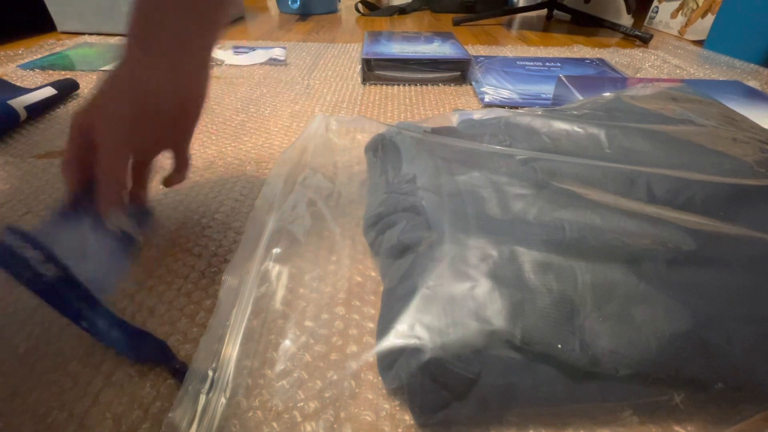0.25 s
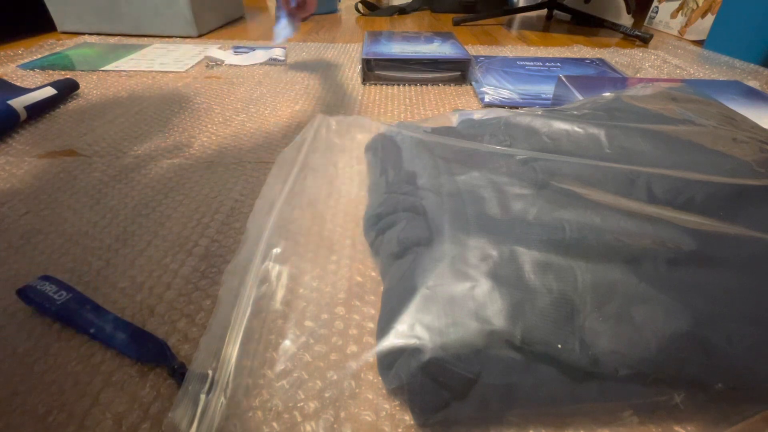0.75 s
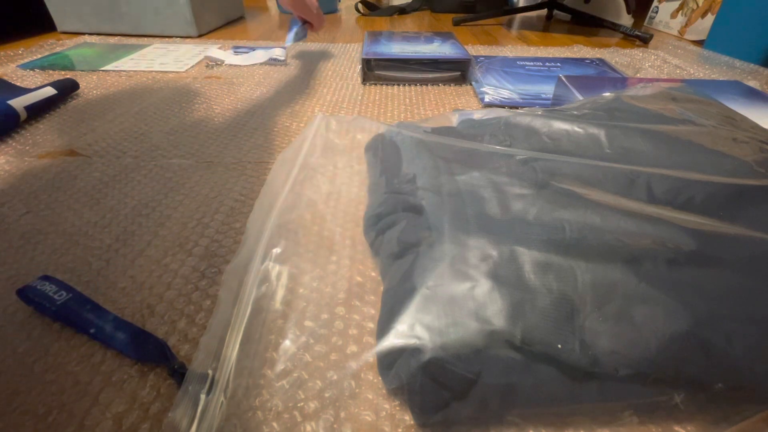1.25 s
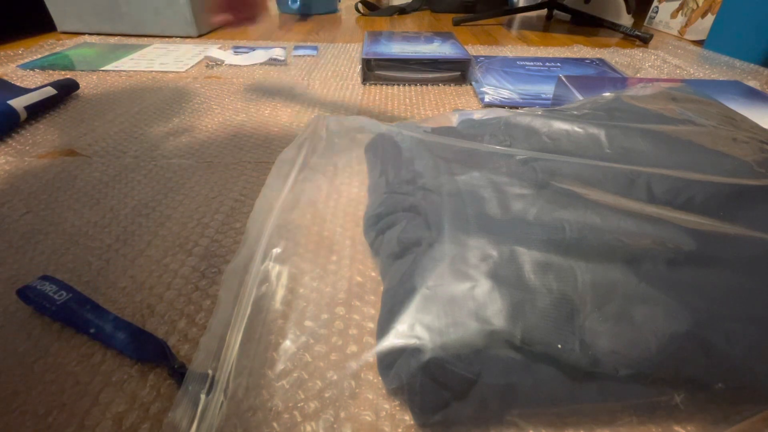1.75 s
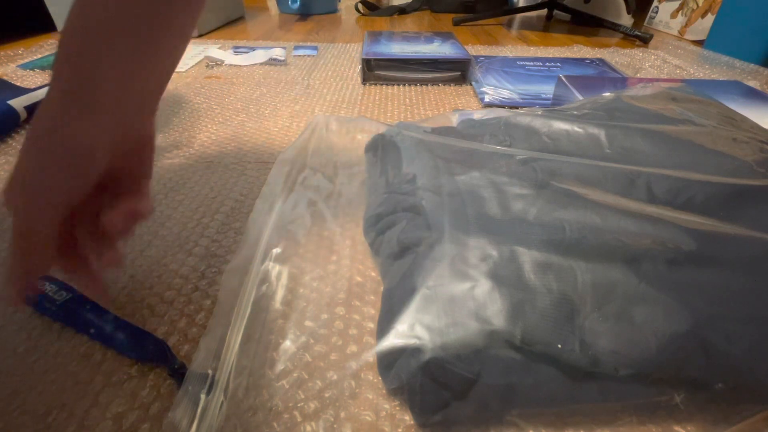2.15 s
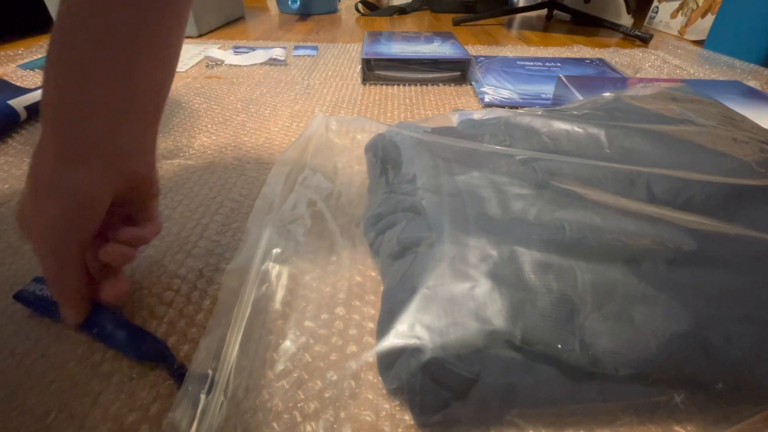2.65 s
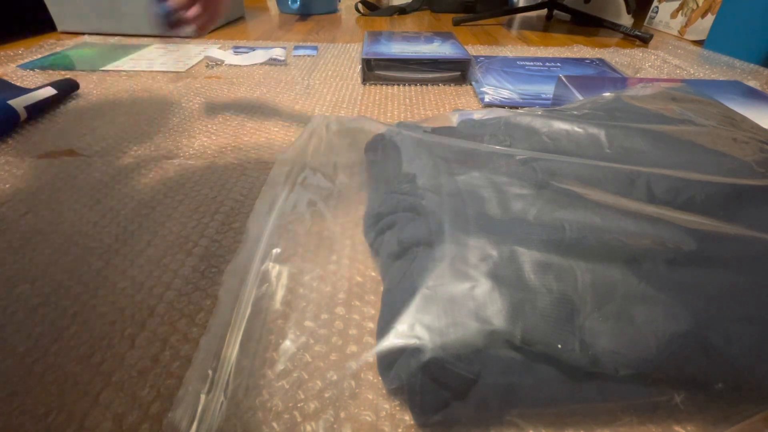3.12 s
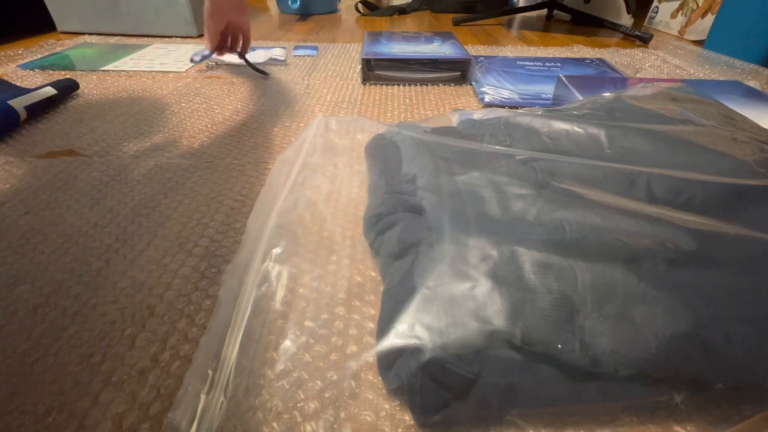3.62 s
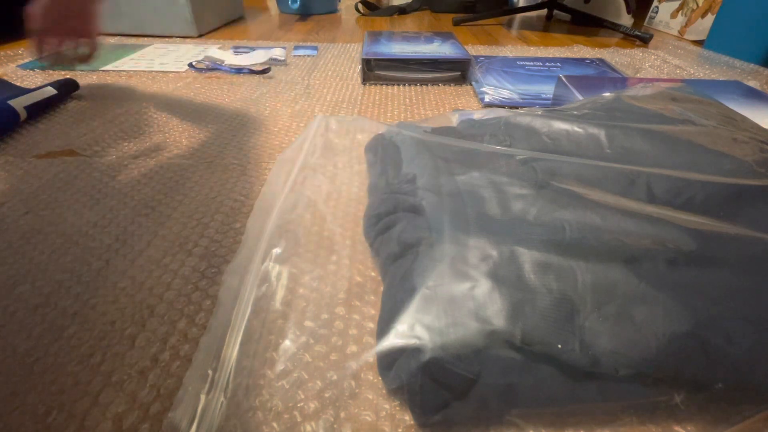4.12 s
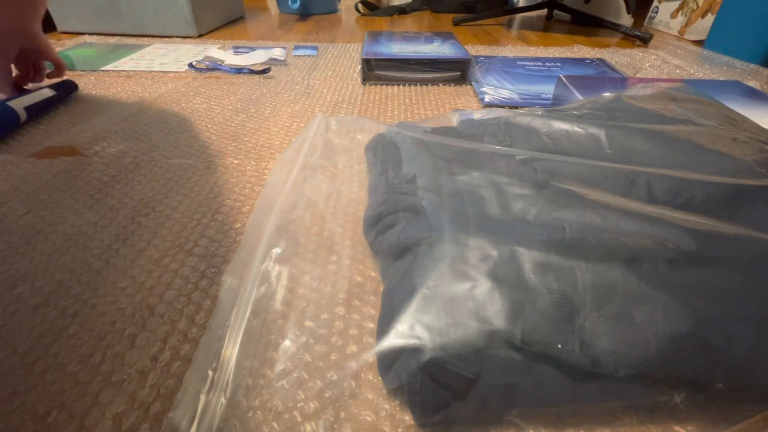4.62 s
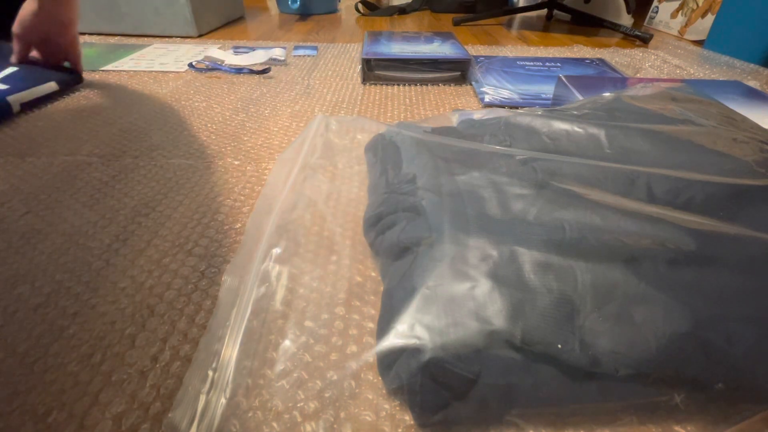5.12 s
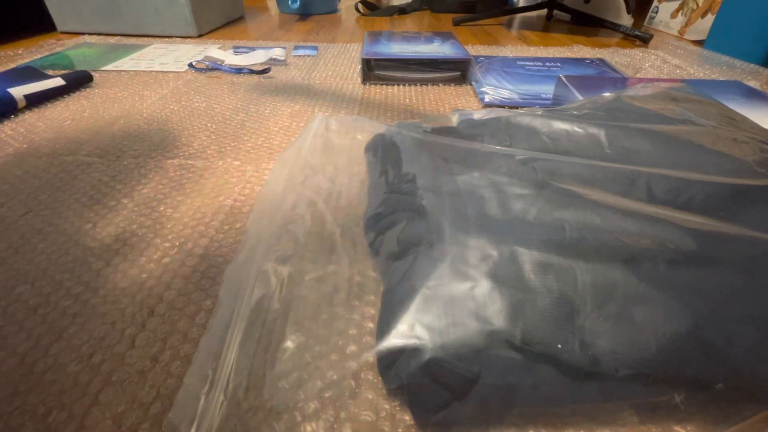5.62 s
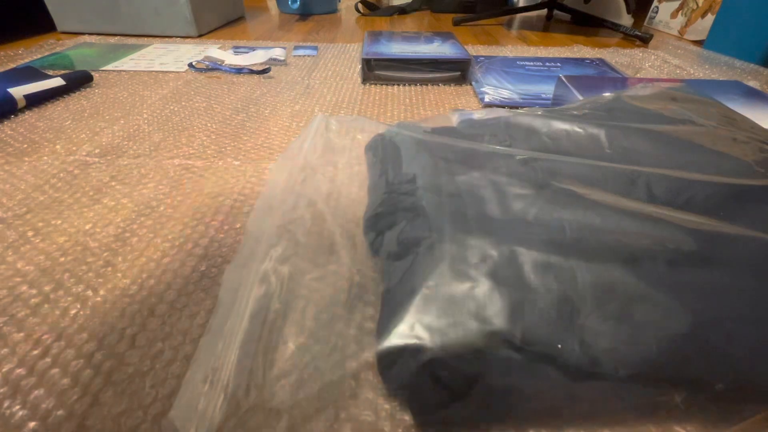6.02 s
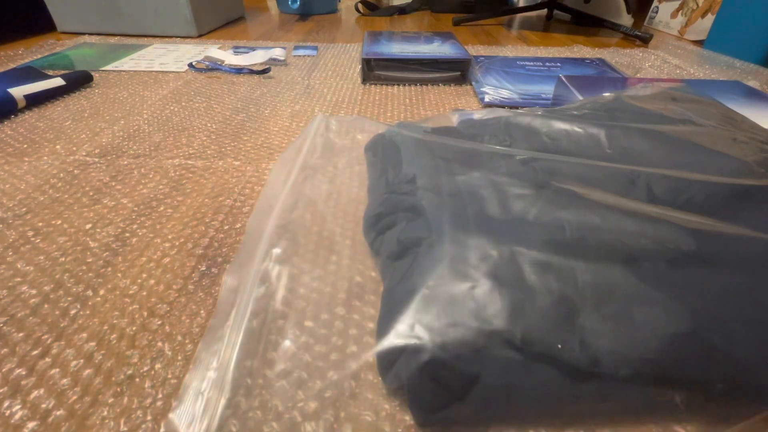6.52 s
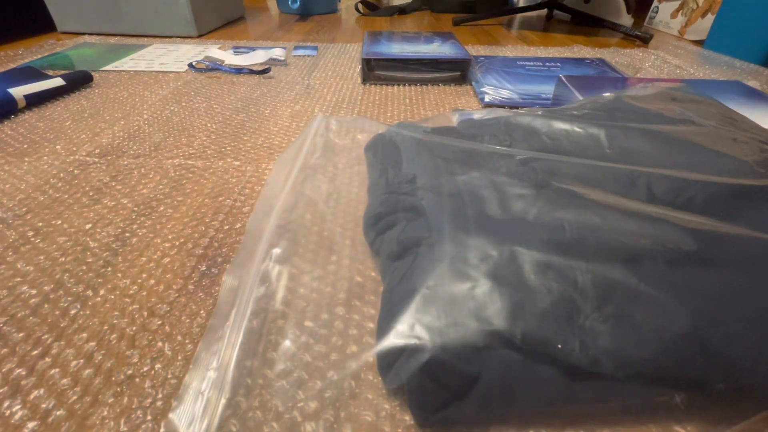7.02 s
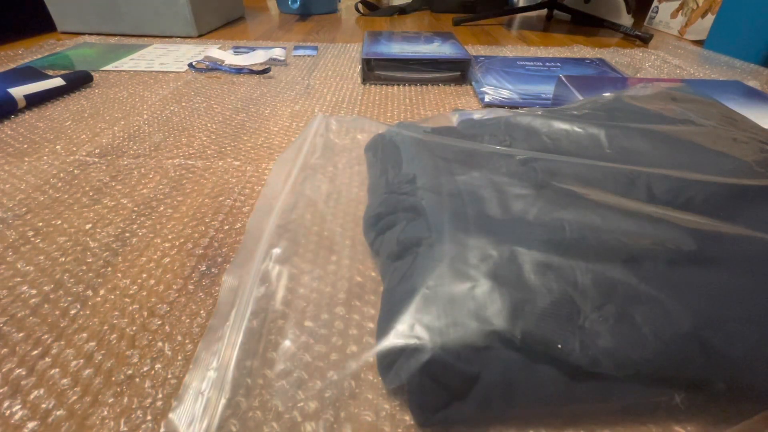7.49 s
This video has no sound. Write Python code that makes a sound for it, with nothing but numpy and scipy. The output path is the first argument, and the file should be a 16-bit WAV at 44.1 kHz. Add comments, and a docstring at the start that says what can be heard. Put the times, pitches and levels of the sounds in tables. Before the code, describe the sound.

Thin plastic crinkles and snaps to the left as small things are picked up, then cloth rustles, joints crack and a low floor thud follows.

```python
"""Things picked off a mat

A hand picks a card, a strap and a packet off a woven mat to the left of a two-port microphone and lays
them out: filtered noise and random clicks make the slide and crinkle of plastic, short bursts the snaps.
Then the person shifts on the wooden floor: soft noise is the cloth, impulses are the cracking joints, and
pushes set wood ringing for knees and hard knocks. The small room echoes and hums faintly below."""
import sys
import numpy as np
from scipy import signal
from scipy.fft import rfft, irfft
from scipy.io import wavfile
from scipy.ndimage import uniform_filter1d

SR = 44100
rng = np.random.default_rng(int(sys.argv[2]) if len(sys.argv) > 2 else 0)


def generate_wav(signal):
    """Clip the signal to [-1, 1] and save it as 16-bit WAV at the path in sys.argv[1]."""
    frames = np.transpose(np.atleast_2d(signal))
    scaled = np.clip(frames, -1, 1) * 32767
    pcm = np.round(scaled).astype(np.int16)
    wavfile.write(sys.argv[1], SR, pcm)


N = 341775
HZ = np.maximum(np.fft.rfftfreq(N, 1 / SR), 1)   # every frequency in the spectrum of the whole sound

# The colour of thin plastic. Each row: frequency in Hz, relative strength in dB.
PLASTIC = [(250, -17), (400, -15), (700, -19), (1040, -6), (1650, -8.5), (2600, -5.5), (3000, 4),
           (3400, 5.5), (3800, 3), (4300, -0.5), (4700, -2.5), (5200, 2), (5500, -6.5), (5900, 5),
           (6500, 3), (7100, 2), (7600, 1), (8000, 5), (9000, -1), (13000, -1.5), (16000, -13.5)]
# How each thing sounds, by name: sizzle above 10.2 kHz, rub under 2.3 kHz and body at 2.3-3.95 kHz, all in
# dB against the main band, then crackle share of the power (0-1, below 0 counts as 0) and flutter in dB.
THINGS = {"card": (-0.5, -11.5, -6, 0.3, 1.64), "laid": (-4, -4.5, -5.5, -0.45, 1.2),
          "strap": (-4.5, -16, -8, 0.5, 1.5), "coiled": (4, -18, -13, 0.4, 2),
          "packet": (-4.5, -3.5, -3.1, 0.33, 0.4)}
# Strokes of the hand. Each row: start in seconds, level in dB, seconds to swell by 20 dB, seconds held,
# seconds to fade by 20 dB, thing handled. Swells and fades below 0.003 s count as 0.003 s.
STROKES = [(0.0, -58.5, .02, 0.024, 0.064, "card"), (0.095, -67, 2.5, 0.025, 0.14, "card"),
           (0.086, -59.5, 0.2, 0.023, 0.0751, "card"), (0.174, -50.5, 0.14, 0.045, 0.0641, "card"),
           (0.22, -57, 0.1, 0.031, 0.02, "card"), (0.267, -79, .03, 0.027, -0.3, "card"),
           (0.34, -79, -1, 0.0034, 0.75, "card"), (0.447, -85, -0.3, 0.015, 1.5, "card"),
           (1.366, -65, 0.01, 0.0076, 0.1347, "laid"), (1.448, -57, 0.0733, 0.019, 0.07, "laid"),
           (1.487, -67.5, 0.05, 0.0083, 0.12, "laid"), (2.199, -62, 0, 0.004, 0.04, "strap"),
           (2.27, -68.5, 0.11, 0.06, 0.32, "strap"), (2.41, -62, 0.04, 0.015, 0.03, "strap"),
           (2.346, -55.5, 0.0159, 0.045, -0.01, "strap"), (2.463, -59.5, 0.0148, 0.059, -0.01, "strap"),
           (2.541, -56, 0.012, 0.058, -0.02, "strap"), (2.657, -57.5, 0.04, 0.03, 0.0168, "strap"),
           (2.7, -60.5, 0.03, 0.014, 0.03, "strap"), (2.79, -63.5, 0.09, 0.036, 0.08, "strap"),
           (2.612, -55.5, 0.12, 0.024, 0.0723, "strap"), (2.757, -60.5, 0, 0.0033, -0.0847, "strap"),
           (2.844, -57, 0.1546, 0.021, 0.01, "strap"), (2.883, -57.5, 0, 0.0087, 0.0169, "strap"),
           (2.902, -70, 0, 0.011, 0.06, "strap"), (3.4, -71.5, 0, 0.004, 0.07, "coiled"),
           (3.533, -76, 0.5, 0.028, -0.17, "coiled"), (3.69, -73.5, 0.14, 0.031, 0.11, "coiled"),
           (4.358, -76.5, 0.18, 0.0043, -6, "packet"), (4.434, -65, 0.0648, 0.068, -0.24, "packet"),
           (4.538, -66.5, 0.0949, 0.038, -0.55, "packet"), (4.594, -73, 0.16, 0.041, 1.7, "packet"),
           (4.706, -68, 0.03, 0.012, 0.2, "packet"), (4.805, -65, 0.0148, 0.097, -2.3, "packet"),
           (5.004, -61, .5, 0.18, 0.18, "packet"), (5.236, -63, 0, 0.026, 0.12, "packet")]


def hand():
    """Sliding friction hiss and clumped crackle of creases, in the colour of thin plastic."""
    clumps = grains(1400 * amp(2.5 * drift(150)), spread_db=5.0)
    both = colour(np.array([rng.standard_normal(N), clumps]), PLASTIC)
    sizzle, rub = cut(both, 10200, "high"), cut(both, 2300, "low")
    body, main = cut(both, [2300, 3950], "band"), cut(both, [4550, 10200], "band")
    bands = [sizzle, rub, body, main]
    flickers = [1.4 * drift(25) for band in bands]   # each band flickers by itself
    out, flutter = 0, drift(23)
    for thing, (*levels_db, crackle, flutter_db) in THINGS.items():
        share = np.sqrt(np.clip([1 - crackle, crackle], 0, 1))
        mix = 0
        for db, band, own in zip([*levels_db, 0], bands, flickers):
            mix = mix + amp(db + flutter_db * own) * rms_one(share @ band)
        # where strokes overlap, the louder one counts
        strokes = np.max([stroke(*row[:5]) for row in STROKES if row[5] == thing], axis=0)
        out = out + amp(flutter_db * flutter) * mix * strokes
    return from_the_left(out)


def stroke(s, db, swell_s, hold_s, fade_s):
    """Gain of one stroke: swell, hold, fade."""
    t = np.arange(N) / SR - s
    swell_db = -20 * np.maximum(-t / max(swell_s, .003), 0)
    fade_db = -20 * np.maximum((t - hold_s) / max(fade_s, .003), 0)
    return amp(db + swell_db + fade_db)


# Short bright snaps of creases and of cloth. Each row: start in seconds, peak at 5.9-8.5 kHz in dB before
# it is placed to the left, brightness in dB (raises the top band and lowers the body).
SNAPS = [(0.0435, -43, 6), (0.074, -38.5, -11), (0.0825, -50, 3), (0.102, -44, -2), (0.1086, -41, -10),
         (0.1225, -50, 13), (0.158, -45, 16), (0.176, -30, 3), (0.194, -47, -10), (0.2123, -37.5, 12),
         (0.2325, -53, 6), (0.259, -44, 5), (0.364, -55, 16.5), (0.375, -42, -10), (0.435, -60, 17),
         (0.4757, -53, 2), (0.565, -62, -24), (1.104, -52, 2.5), (1.4387, -46, 6), (1.732, -61, -19.5),
         (1.835, -62.5, 1.5), (2.189, -63, 11), (2.204, -51, 0), (2.2063, -33, 0.5), (2.223, -51, 17),
         (2.2344, -64.5, 2), (2.268, -52, -16), (2.336, -48, 5), (2.3445, -52, -4), (2.3505, -48, -3),
         (2.362, -49, -3.5), (2.409, -43, -4), (2.4195, -39.5, 5), (2.457, -49, 12), (2.4624, -46, 8),
         (2.4683, -39.5, 6.5), (2.48, -46, 7), (2.4962, -34.5, 2), (2.5506, -34, 1), (2.5632, -39, 6),
         (2.593, -38, 2), (2.599, -39, -3), (2.6066, -34, 4), (2.632, -56, 2), (2.647, -47, 9),
         (2.661, -42, 4), (2.703, -54, 11), (2.735, -54, 10), (2.758, -43, 5), (2.784, -57, 10),
         (2.808, -52.5, 1), (2.833, -40, 7), (2.836, -39, 2), (2.838, -49, 0), (2.858, -37.5, 8),
         (2.86, -42, 2), (2.847, -41, -3), (2.872, -44, 3), (2.883, -51, 0), (2.8855, -34.5, -12.5),
         (2.8918, -41, 13), (3.208, -60, 0), (3.382, -84, -10), (3.4685, -70, 10), (3.508, -52.5, 17.5),
         (3.6456, -72.5, 22), (3.6905, -57.5, 0.5), (3.7321, -49, -9), (3.856, -75, 8.5), (3.985, -66, 20),
         (4.213, -75, 15), (4.301, -57, 6), (4.54, -47, -21), (4.664, -69, -4), (4.6776, -67, 2),
         (5.304, -43, -10), (5.325, -54, 12.5), (5.699, -44.5, -1), (5.6703, -44.5, 7), (5.738, -50, -17),
         (5.7994, -57, -2), (6.4032, -52.5, 1), (6.4453, -66, -18), (6.4926, -48, 0), (6.5252, -44.5, -3),
         (7.416, -66, 7)]
# Milliseconds to die by 60 dB: the main band, the top band, the body.
SNAP_MS = [6.5, 2.5, 6.5]
SNAP_TOP_DB, SNAP_BODY_DB = -4.5, -15   # top band and body against the main peak
SNAP_BODY_FOLLOWS = 0.61   # dB of body lost per dB of brightness


def snaps():
    """Each snap dies in a few milliseconds: a tick and grit in three bands."""
    out = np.zeros(N + 800)
    edges_hz = [(5900, 8530), (10970, 14500), (1950, 4100)]
    for (s, db, bright_db), noise in zip(SNAPS, rng.standard_normal((len(SNAPS), 600))):
        i = round(s * SR)
        sharp = noise + 6.2 * signal.unit_impulse(600)   # a leading tick, then grit
        top_db = db + SNAP_TOP_DB + bright_db
        body_db = db + SNAP_BODY_DB - SNAP_BODY_FOLLOWS * bright_db
        out[i:i + 600] += in_bands(sharp, SNAP_MS, edges_hz, [db, top_db, body_db])
    return from_the_left(out[:N])


def in_bands(x, rings_ms, edges_hz, levels_db):
    """Bands of a burst, each dying at its own rate and set to its own peak."""
    out = 0
    for ms, edge, db in zip(rings_ms, edges_hz, levels_db):
        band = cut(burst(x, max(ms, 1) / 1000), edge, "band", order=2)
        out = out + amp(db) * band / np.max(np.abs(band))
    return out


# Level difference for a source on the left. Each row: frequency in Hz, left over right in dB.
SHADOW = [(60, 9), (150, -1.5), (380, 3), (950, 7.5), (2380, 7.5), (5980, 14), (15000, -8.5)]
LEFT_LAG_MS = -0.431   # negative: the left port hears it first


def from_the_left(x):
    """Sound from the left: earlier at the left port, its level there depending on pitch."""
    return place(x, LEFT_LAG_MS, at_hz(SHADOW, HZ))


FAR_PORT_ECHO_DB, FAR_PORT_ECHO_MS = -1.5, 1.5   # the reflection; its delay wanders around this


def far_port(x):
    """The shaded right port also hears the hand by way of the mat, along a path that wanders slowly."""
    delay = FAR_PORT_ECHO_MS * SR / 1000 * np.clip(1 + .4 * drift(1.5), .1, 3)   # in samples
    late = np.interp(np.arange(N) - delay, np.arange(N), x[1])
    late = cut(late, [1500, 9800], "band", order=2)
    return x + amp(FAR_PORT_ECHO_DB) * late * [[0], [1]]


# Hard little cracks of card edge and joints. Each row: start in seconds, relative level in dB, slope in dB
# per octave, ring in Hz, ring in dB, second ring in Hz, its dB, left over right in dB, rattle in ms to die
# by 60 dB (at least 2).
CRACKS = [(0.108, -61.5, 2, 2710, 14, 1840, 17, 2.5, 11), (0.134, -53, -2.7, 2110, 23, 6640, 17, 7.5, 15),
          (0.1355, -57.5, 3.5, 990, 22, 5000, 10, 1, 21),
          (0.1362, -49.5, -0.5, 2760, 19, 5100, 3, 5.5, 12.4), (0.349, -68, 6, 3530, 2, 6900, -0.5, 7, 34),
          (1.368, -69, 3.5, 1020, 20, 6960, 2, 0, 20), (5.243, -53, 1.1, 1500, 14, 3000, -4, 5.5, 4.9),
          (5.249, -60.5, -3, 3000, 8, 1100, 8, 8.5, 11), (5.608, -63, -2, 1650, 19, 2540, 14, 5.5, 5.9),
          (5.6103, -64.5, 1.5, 5170, 6, 7000, 5, 12, 7.1), (6.0723, -66, -2, 8200, 19, 6200, 3, 12, 18),
          (6.0746, -45.5, -2, 8500, 13.5, 2200, 15, 8, 3),
          (6.0764, -51.5, -4.5, 1370, 10, 4350, -1, -2, 27),
          (6.7736, -51.5, -2.5, 8560, 16.5, 5100, 6, 7, 8.7),
          (6.7744, -55, -4, 1020, 17.5, 2460, 12, 6.5, 8.5), (7.27, -44, -4.5, 5270, 11, 3330, 8.5, 6, 21),
          (7.2712, -54.5, -4.5, 920, 7, 2140, 20, 3, 15), (7.65, -67, -13.5, 690, 3.5, 1200, -9, -1, 28)]
# Colour shared by all cracks. Each row: frequency in Hz, strength in dB.
CRACK_COLOUR = [(150, -1.1), (4300, -1.5), (5000, 0.5), (5600, -2), (6800, -0.5), (8200, -0.1),
                (9500, -5.5), (16000, -4.5)]
CRACK_LAG_MS, RING_OCTAVES, CRACK_TOP_DB = -0.27, 0.23, -5.5   # left first; ring width; above 10 kHz
CRACK_ECHO_DB, ECHO_RING_SHARE = 3.5, 0.47   # impulse sent to the room; share of the rings' dB in it


def cracks():
    """One sharp impulse and a brief rattle, sloped and with two rings; the impulse also excites the room."""
    out = np.zeros((2, 2, N + 3000))   # heard directly or sent to the room, then left or right
    hz = np.geomspace(150, 16000, 120)
    noises = rng.standard_normal((len(CRACKS), 3, 1500))
    for (s, db, slope_db, *rings, pan, rattle_ms), noise in zip(CRACKS, noises):
        impulse = signal.unit_impulse(1500)
        # the rattle is partly its own at each port
        left, right = [burst(0.4 * noise[0] + 0.29 * own, max(rattle_ms, 2) / 1000) for own in noise[1:]]
        parts = [0.28 * impulse + left, 0.68 * impulse + right, amp(CRACK_ECHO_DB) * impulse]
        shape_db = db + slope_db * np.log2(hz / 2000) + at_hz(CRACK_COLOUR, hz)
        shape_db = shape_db - 9.5 * np.log2(np.maximum(800 / hz, 1))   # little bass
        shape_db = shape_db + CRACK_TOP_DB * (hz > 10000)
        rings_db = 0
        for ring_hz, ring_db in np.reshape(rings, (2, 2)):
            rings_db = rings_db + ring_db * np.exp(-(np.log2(hz / ring_hz) / RING_OCTAVES) ** 2)
        shares = [1, 1, ECHO_RING_SHARE]
        x = [colour(part, np.c_[hz, shape_db + share * rings_db]) for part, share in zip(parts, shares)]
        x = amp(25.5) * np.array(x)
        for side, sign in enumerate((1, -1)):
            i = round((s + sign * CRACK_LAG_MS / 2000) * SR)   # half the lag at each port
            out[:, side, i:i + 1500] += amp(sign * pan / 2) * x[[side, -1]]
    return out[..., :N]


# The cloth's colour. Each row: frequency in Hz, relative strength in dB.
CLOTH = [(90, -29.5), (150, -4), (300, -2.5), (700, -5.5), (1200, -7.5), (1800, -12.5), (2300, -17),
         (4000, -12), (8000, -7), (13000, -22), (16000, -28.5)]
# Cloth as the person shifts, before the trims below. Each row: time in seconds, swish under 2.15 kHz in dB,
# hiss at 2.1-10.2 kHz in dB, sizzle above 9.2 kHz in dB.
SHIFT = [(5.4, -79, -96, -86), (5.455, -83, -80, -86), (5.47, -76, -74, -79), (5.52, -73.5, -68.5, -76),
         (5.56, -67.5, -68.5, -66), (5.6, -65.5, -68, -60), (5.65, -62.5, -62, -67), (5.71, -68, -66, -69),
         (5.745, -72, -68, -74), (5.78, -77, -69.5, -78), (5.85, -65, -74.5, -76), (5.9, -75, -80, -80),
         (5.93, -84, -72.5, -75), (6.04, -81, -82.5, -75), (6.09, -68, -57, -75.5), (6.14, -69.5, -61, -84),
         (6.22, -68.5, -71, -77), (6.33, -75, -68.5, -73), (6.44, -81.5, -79, -89),
         (6.51, -73.5, -65, -66.5), (6.6, -69.5, -68, -81.5), (6.73, -66.5, -71, -77),
         (6.84, -65, -65, -71.5), (7.03, -62, -61.5, -67.5), (7.17, -71, -66.5, -76), (7.27, -71, -76, -79),
         (7.44, -82, -82.5, -83.5), (7.63, -63.5, -70.5, -79), (7.75, -62.5, -68.5, -88)]
# The sleeve as the arm reaches. Each row: time in seconds, swish in dB, hiss in dB.
REACH = [(0.3, -82.5, -107), (0.55, -83, -88), (1.02, -77.5, -85.5), (1.33, -82, -81), (1.6, -85, -93),
         (1.84, -83, -86.5), (2.1, -84, -100), (2.55, -83.5, -94), (2.93, -86.5, -93), (4.4, -85.5, -98.5),
         (5.4, -125, -91)]


def cloth():
    """Broad soft swish from all round, in patches, with a slight crumple."""
    on, swish_db, hiss_db, sizzle_db = in_time(SHIFT)
    crumple = place(colour(grains(600, spread_db=1.0), CLOTH), lag_ms=-0.29, pan_db=27.3)
    x = rms_one(diffuse(CLOTH)) + .5 * rms_one(crumple)
    swish = rms_one(cut(x, 2150, "low"))
    hiss = rms_one(cut(x, [2100, 10200], "band"))
    sizzle = rms_one(cut(x, 9200, "high"))
    shift = amp(swish_db + 2.0 + 2.44 * drift(16.5)) * swish
    shift = shift + amp(hiss_db - 1.0 + 1.04 * drift(7.3)) * hiss
    shift = shift + amp(sizzle_db + 4.5 * drift(20)) * sizzle
    reaching, reach_db, brush_db = in_time(REACH)
    sleeve = reaching * (amp(reach_db) * swish + amp(brush_db) * (hiss + amp(-2.0) * sizzle))
    soft_on = uniform_filter1d(on * 1., size=2000)   # no click where the shifting starts
    return (soft_on * shift + sleeve) * amp([[1.2], [-1.2]])   # slightly louder on the left


# A short squeak in the rustle. Each row: time in seconds, pitch in Hz, level in dB.
SQUEAK = [(5.615, 1950, -85), (5.625, 1950, -67), (5.635, 1750, -69), (5.648, 1600, -85)]


def squeak():
    """A brief, slightly rough tone sliding down."""
    on, hz, db = in_time(SQUEAK)
    return on * amp(db + 3.6 * drift(150)) * np.sin(2 * np.pi * np.cumsum(hz) / SR)


# Where thuds and knocks come from, by name: lag of the left port in ms, left over right in dB.
PLACES = {"left": (-0.4, 3.5), "behind": (0.47, -0.7)}
# Weight landing on the boards. Each row: start in seconds, relative strength in dB, contact in ms, place.
THUDS = [(1.448, -51, 0.13, "left"), (2.2, -52, 0.29, "left"), (2.848, -53.5, 0.093, "left"),
         (5.073, -44.5, 0.59, "left"), (5.304, -44, 0.9, "left"), (5.598, -38, 2.4, "left"),
         (6.08, -41, 0.7, "left"), (6.225, -11.5, 1.5, "behind"), (6.487, -51, 0.17, "behind"),
         (7.495, -31, 0.17, "behind"), (7.548, -40, 0.38, "behind")]
# Tones of the floor boards. Each row: frequency in Hz, relative level in dB, longest time in seconds to
# die by 60 dB.
BOARDS = [(36.8, -14, 0.54), (61.3, -3, 0.17), (105.3, 0, 0.22), (139.7, -2.5, 0.15), (185.5, -4.5, 0.155),
          (243.8, 0.5, 0.19), (320, 1.5, 0.017)]


def thuds():
    """Soft pushes ring the floor boards."""
    rings = amp(-10.5) * struck(pushes(THUDS), BOARDS)
    return sum(place(x, *where) for x, where in zip(rings, PLACES.values()))


# Things knocking on wood. Each row: start in seconds, relative strength in dB, contact in ms, place.
KNOCKS = [(0.109, -47, 0.13, "left"), (0.697, -64, 0.052, "left"), (1.369, -41, 0.32, "left"),
          (1.382, -43, 0.31, "left"), (1.391, -40.5, 0.51, "left"), (4.134, -48, 0.81, "left"),
          (4.165, -45, 1.2, "left"), (4.302, -47.5, 0.65, "left"), (5.075, -54.5, 0.024, "left"),
          (5.303, -41.5, 0.055, "left"), (5.306, -45, 0.62, "left"), (5.32, -39.5, 0.41, "left"),
          (5.839, -57, 0.037, "left"), (6.661, -21, 0.077, "behind"), (7.274, -39.5, 0.21, "left"),
          (7.496, -46, 0.51, "behind"), (7.506, -46, 0.29, "behind"), (7.524, -31.5, 1.1, "behind"),
          (7.548, -40, 0.98, "behind"), (7.629, -43.5, 0.14, "behind"), (7.652, -44, 0.3, "behind")]
# Tones of the knocked wood. Each row: frequency in Hz, relative level in dB, longest time in seconds to
# die by 60 dB.
KNOCKED = [(104.3, -18.5, 0.16), (170, -5.5, 0.04), (252, -4.5, 0.13), (335.6, -2.5, 0.064),
           (421, 0.5, 0.024), (621, -3, 0.022), (742, 3, 0.016), (843, 1, 0.021), (1020, -5, 0.012),
           (1333, 4, 0.011), (1500, -0.5, 0.0041), (2098, -7, .01), (2700, -9.5, 0.0094),
           (3350, -38, 0.0076)]
# Hard blows from behind. Each row: frequency in Hz, left over right in dB, radians by which left leads.
BEHIND_PORTS = [(100, -2, -1.2), (250, -1.5, 0.2), (448, 3.5, -0.9), (750, 8.5, -1), (1300, -3, -2),
                (3000, 4.5, -2.5)]


def knock():
    """Harder blows into short wooden modes."""
    left, behind = amp(-4.5) * struck(pushes(KNOCKS), KNOCKED)
    hz, pan_db, lead = np.transpose(BEHIND_PORTS)
    lag_ms = -1000 * at_hz(np.c_[hz, lead], HZ) / (2 * np.pi * HZ)
    return place(left, *PLACES["left"]) + place(behind, lag_ms, at_hz(np.c_[hz, pan_db], HZ))


def pushes(events):
    """Smooth contact forces of unit area, scaled by strength, one track for each place: longer is duller."""
    out, ms = np.zeros((len(PLACES), N + 2000)), np.arange(2000) * 1000 / SR
    for s, db, contact_ms, where in events:
        i = round(s * SR)
        force = ms * np.exp(-ms / max(contact_ms, .02))
        out[list(PLACES).index(where), i:i + 2000] += amp(db) * force / force.sum()
    return out[:, :N]


MOST_CYCLES = 28   # wood damps any mode within this many cycles


def struck(force, modes):
    """Modes of alternating sign, as radiated from a flexing board."""
    out = 0
    for k, (hz, db, t60) in enumerate(modes):
        out = out + (-1) ** k * amp(db) * ring(force, hz, min(t60, MOST_CYCLES / hz))
    return out


# Alikeness of the two sides in the echo tail. Each row: frequency in Hz, likeness (1 is the same).
ECHO_LIKENESS = [(60, 0.95), (250, 0.86), (500, 0.29), (1000, 0.058), (8000, 0.041)]
# How long the room echoes. Each row: frequency in Hz, seconds to die by 60 dB.
ROOM_T60 = [(100, 0.29), (1000, 0.19), (8000, 0.24)]


def room(x):
    """Echo tail: octave bands of noise dying at their own rate, alike on both sides in the bass."""
    t, tail = np.arange(SR // 2) / SR, 0
    for hz in 60 * 2. ** np.arange(8):
        octave = [hz / np.sqrt(2), hz * np.sqrt(2)]
        mid, side = cut(rng.standard_normal((2, len(t))), octave, "band", order=2)
        noise = two_sides(mid, side, at_hz(ECHO_LIKENESS, hz))
        tail = tail + noise * amp(-60 * t / at_hz(ROOM_T60, hz)) * np.clip(t / 0.00048, 0, 1)
    tail = tail / np.sqrt(np.sum(tail ** 2) / 2)
    return signal.fftconvolve(x, tail, axes=-1)[:, :N]


# Low room modes in which the house rumbles. Each row: frequency in Hz, width in Hz, relative level in dB.
HUM = [(34.6, 20, -9), (54.5, 3.4, -14.5), (71, 17, 4.5), (119.6, 8, -9), (160, 5.7, -17.5)]
# Loudness of the rumble. Each row: time in seconds, level in dB, around which it wanders.
RUMBLE = [(0.0, -71), (0.24, -63.5), (0.41, -82), (0.48, -68.5), (1.8, -72), (1.96, -62.5), (2.14, -74.5),
          (3.1, -69.5), (3.3, -72.5), (4.3, -74), (5.12, -68), (5.45, -72.5), (6.1, -63.5), (6.21, -61),
          (6.28, -50), (6.45, -60), (6.72, -59), (6.84, -64.5), (7.06, -60), (7.26, -69.5), (7.54, -61),
          (7.75, -59)]


def rumble():
    """Noise ringing in the room's lowest modes, swelling and sinking."""
    _, level_db = in_time(RUMBLE)
    noise = diffuse([(10, 0), (20000, 0)])
    modes = 0
    for hz, width, db in HUM:
        mode = cut(noise, [hz - width / 2, hz + width / 2], "band", order=2)
        modes = modes + amp(db) * rms_one(mode)
    wander_db = 1.5 * drift(3.0)
    return amp(level_db + wander_db) * rms_one(modes)


# Colour of the room tone. Each row: frequency in Hz, relative strength in dB.
AIR = [(76, -33), (130, 3.5), (187, -8.5), (248, 1.5), (363, -18), (850, -23.5), (2000, -28.5),
       (5000, -27.5), (8500, -27.5), (13000, -32), (13900, -34), (14500, -52), (16000, -60)]
AIR_DB = -80.5   # level of the part above 252 Hz, around which it wanders


def air():
    """Room tone: noise that wanders only slightly in level."""
    x = diffuse(AIR)
    wander_db = 1.5 * drift(3.9)
    return amp(AIR_DB + wander_db) * x / np.std(cut(x, 252, "high"))


# Alikeness of the two sides in sound from all round. Each row: frequency in Hz, likeness (1 is the same,
# below 0 is opposed).
LIKENESS = [(60, 0.84), (130, 0.61), (290, 0.5), (640, -0.24), (1410, 0.36), (3100, -0.026), (6820, -0.11),
            (15000, 1)]


def diffuse(points):
    """Stereo noise of the given spectrum whose two sides are more or less alike by pitch."""
    mid, side = rfft(rng.standard_normal((2, N)))
    pair = two_sides(mid, side, at_hz(LIKENESS, HZ))
    return irfft(pair * amp(at_hz(points, HZ)), N)


def two_sides(mid, side, alike):
    """Left and right from a shared and an opposed noise."""
    alike = np.clip(alike, -1, 1)
    return np.sqrt(1 + alike) * mid + np.sqrt(1 - alike) * side * [[1], [-1]]


def place(x, lag_ms, pan_db, mono_hz=10500):
    """The two sides differ in time and level; above mono_hz they are made the same."""
    apart = 1 / (1 + (HZ / mono_hz) ** 20)
    half = apart * (np.log(amp(pan_db / 2)) - 1j * np.pi * HZ * lag_ms / 1000)   # half on each side
    return irfft(rfft(x) * np.exp([half, -half]), N)


def grains(per_s, spread_db):
    """Random clicks, a few much larger than the rest; rms 1."""
    sizes = amp(spread_db * np.minimum(rng.exponential(1, N), 3.0)) * rng.choice([-1, 1], N)
    return rms_one(sizes * (rng.random(N) < per_s / SR))


def burst(noise, t60):
    """Noise that starts at once and dies by 60 dB in t60 seconds."""
    return noise * amp(-60 * np.arange(noise.shape[-1]) / SR / t60)


def ring(clicks, hz, t60):
    """A unit click sets a dying sine of starting height 1 ringing."""
    r, w = amp(-60 / (max(t60, .002) * SR)), 2 * np.pi * hz / SR
    return signal.lfilter([0, np.sin(w)], [1, -2 * r * np.cos(w), r * r], clicks + 1e-18)


def drift(rate):
    """Smoothed random wander of rms 1; a higher rate in Hz wanders faster."""
    r = np.exp(-2 * np.pi * rate / SR)
    return rms_one(signal.lfilter([1], [1, -2 * r, r * r], rng.standard_normal(N + SR))[SR:])


def colour(x, points):
    """Causal (minimum-phase) filter with the given spectrum."""
    grid = np.maximum(np.fft.rfftfreq(8192, 1 / SR), 1)
    cep = irfft(np.log(amp(at_hz(points, grid))))
    cep[1:4096] *= 2   # folding the cepstrum puts the response after the click
    cep[4097:] = 0
    response = irfft(np.exp(rfft(cep)))
    return signal.fftconvolve(np.atleast_2d(x), [response], axes=-1)[:, :x.shape[-1]].squeeze()


def cut(x, hz, kind, order=4):
    """Butterworth filter."""
    sos = signal.butter(order, np.clip(hz, 10, .45 * SR), kind, fs=SR, output="sos")
    return signal.sosfilt(sos, x)


def at_hz(points, hz):
    """A spectrum read on a log axis."""
    return np.interp(np.log(hz), np.log(np.array(points)[:, 0]), np.array(points)[:, 1])


def in_time(rows):
    """Whether each sample lies within a curve's span, then the curve's columns sample by sample."""
    s, *columns = np.transpose(rows)
    t = np.arange(N) / SR
    return [(t >= s[0]) & (t <= s[-1])] + [np.interp(t, s, c) for c in columns]


def rms_one(x):
    """Scaled to rms 1."""
    return x / np.sqrt(np.mean(x ** 2) + 1e-20)


def amp(db):
    """Gain of a level in dB."""
    return 10 ** (np.asarray(db) / 20)


WOOD_ECHO_HZ = 650   # the boards send mostly their bass round the room


def scene():
    """All sources; the hand, snaps, cracks and wood also echo in the room, the near ones only weakly."""
    near = far_port(hand() + snaps())
    low = thuds() + knock()
    blows, blows_far = cracks()
    low_far = amp(-8.5) * cut(low, WOOD_ECHO_HZ, "low", order=1)
    echoes = room(amp(-14) * near + blows_far + low_far)
    return near + blows + low + echoes + cloth() + squeak() + rumble() + air()


# The housing colours everything: notches and peaks of its ports. Each row: frequency in Hz, gain in dB.
MIC = [(20, 4.5), (4900, 1.5), (5550, -3), (6300, -0.5), (6900, -0.5), (7450, -8.5), (8300, 0),
       (9300, -2.5), (10500, -7), (12800, 6), (14000, -1), (16000, -6.5)]
CUTOFF_HZ = 16400


def record(dry):
    """Port colour; the deepest bass is rolled off, the top is cut."""
    heard = cut(colour(dry, MIC), 18, "high", order=2)
    return signal.sosfilt(signal.cheby2(12, 60, CUTOFF_HZ, fs=SR, output="sos"), heard)


dry = scene()
out = record(dry)
generate_wav(out)
```